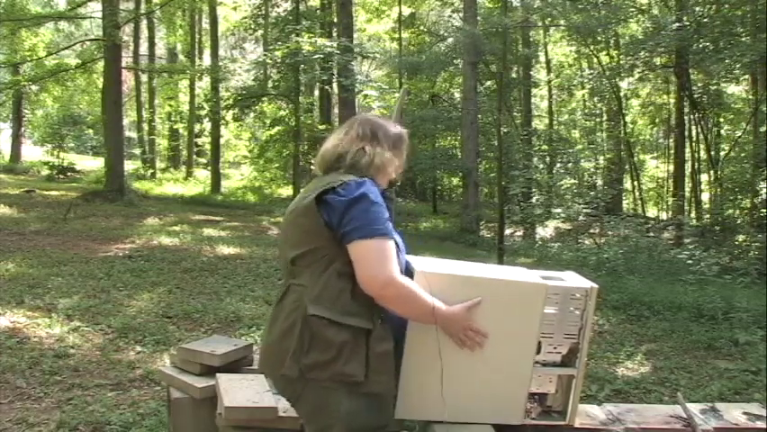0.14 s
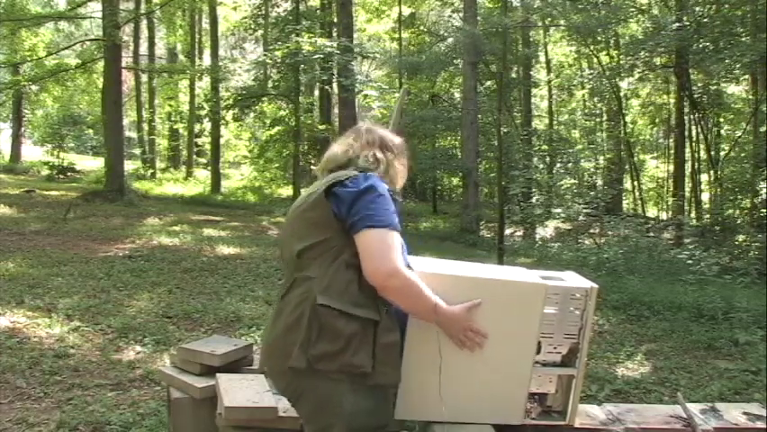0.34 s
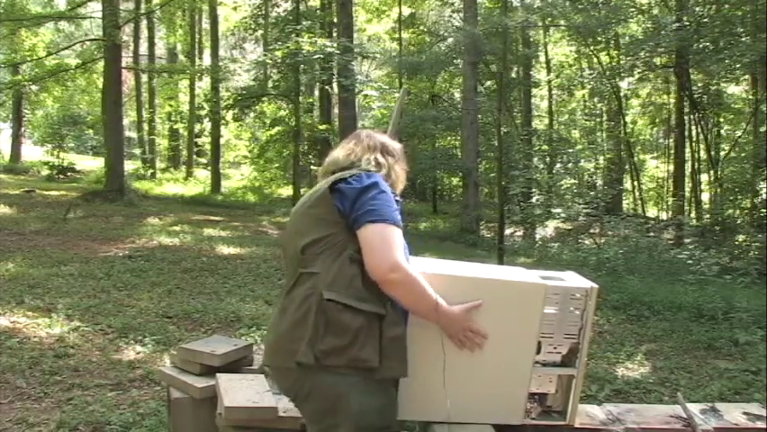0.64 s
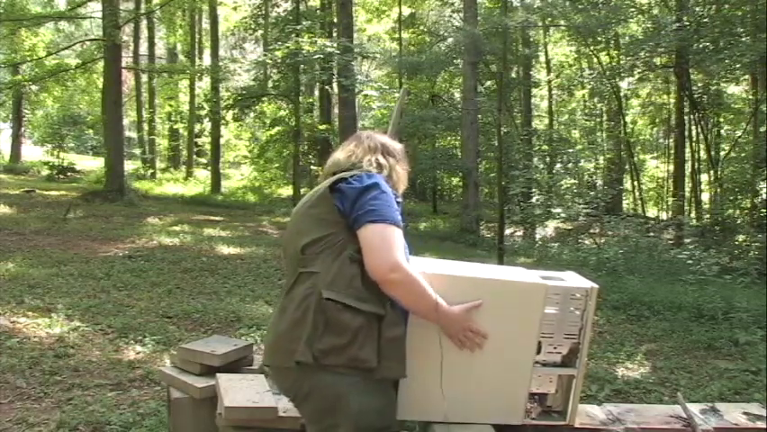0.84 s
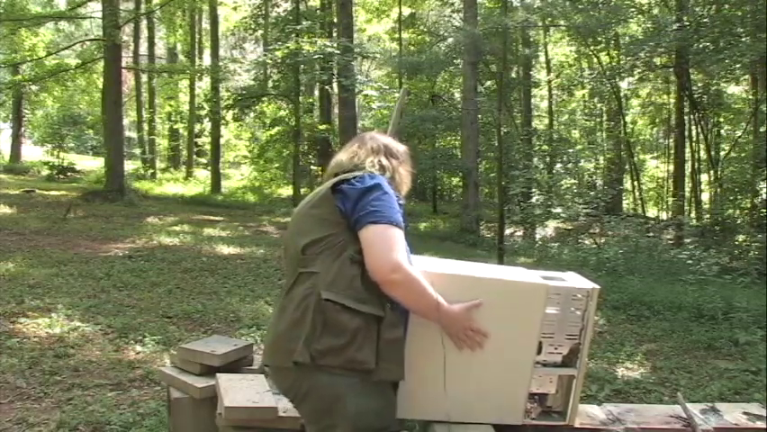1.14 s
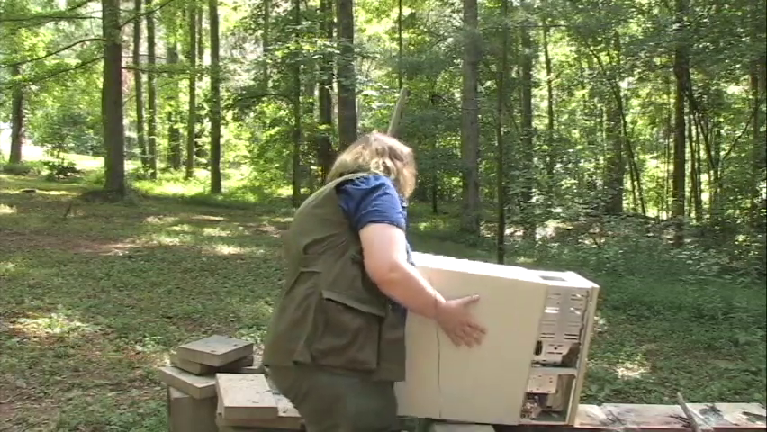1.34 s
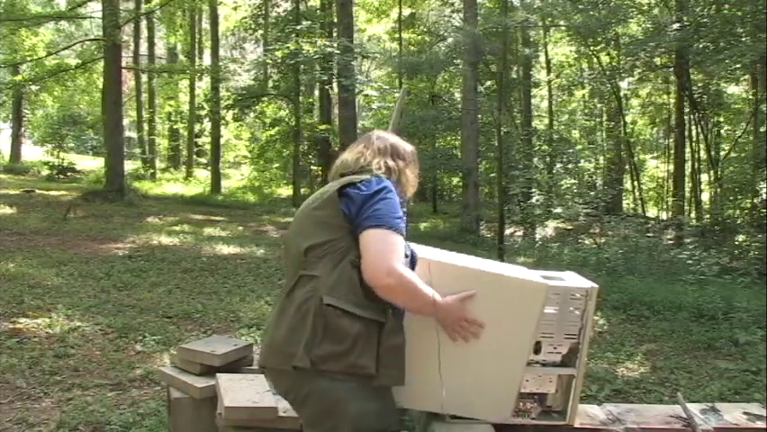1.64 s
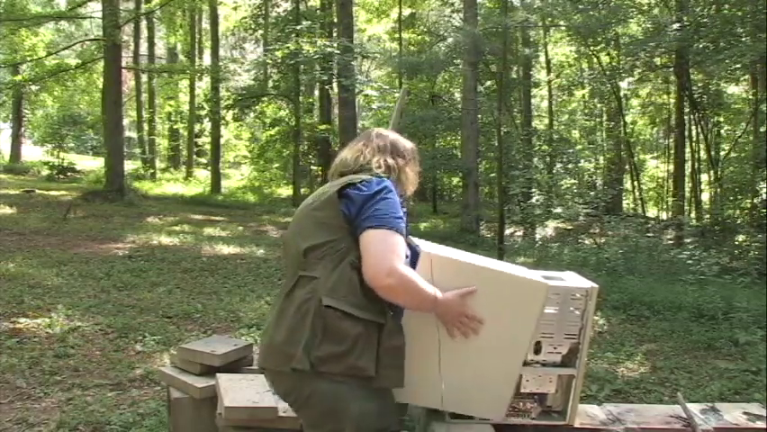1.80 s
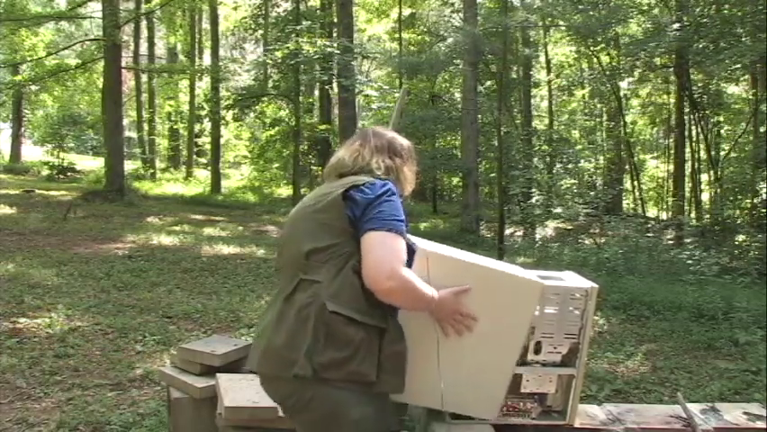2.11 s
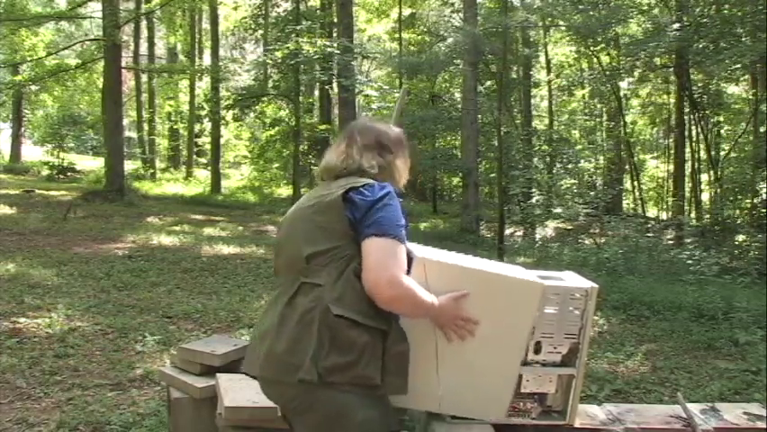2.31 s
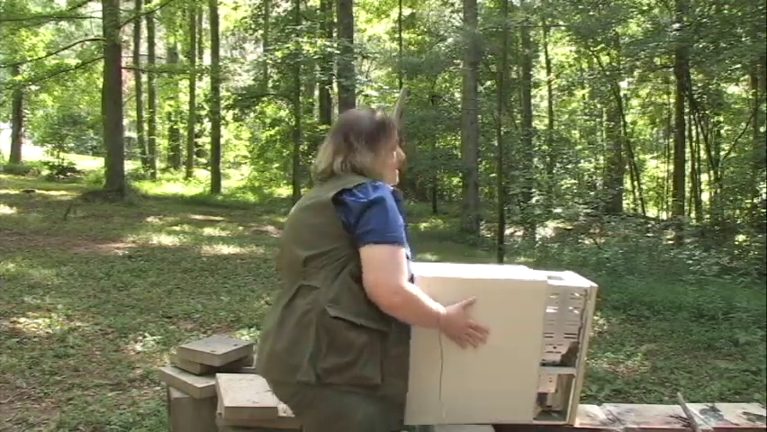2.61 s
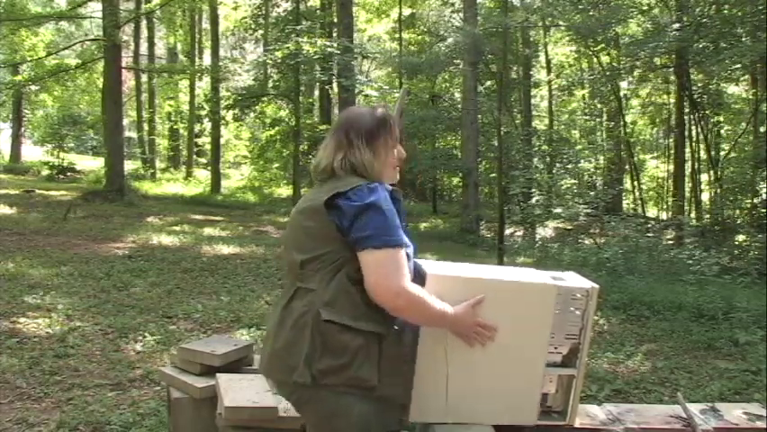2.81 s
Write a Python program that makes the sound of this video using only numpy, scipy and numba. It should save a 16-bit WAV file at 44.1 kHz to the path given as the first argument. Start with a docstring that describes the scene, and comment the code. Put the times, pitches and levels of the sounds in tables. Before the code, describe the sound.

A sheet-metal computer cover knocks and scrapes along its frame, with hollow clanks building outdoors

```python
"""Sheet-metal cover pushed along its frame

A computer cover is pushed and slid along its frame by hand, outdoors in a wood. Edges knock and catch,
metal scrapes on metal: short pushes and dense random catches both shake the same many panel modes and a
hollow boom whose pitch moves. Some panels ring on as fading sines, and a thin squeak is a gliding sine.
Filtered noise makes the distant rumble and air underneath.
"""
import sys
import numpy as np
from scipy import signal
from scipy.fft import rfft, irfft
from scipy.io import wavfile
from numba import njit

SR = 44100
rng = np.random.default_rng(int(sys.argv[2]) if len(sys.argv) > 2 else 0)


def unload_audio(sound):
    """Save the sound as a 16-bit wav file, at the path given as the first command line argument."""
    columns = np.transpose(np.atleast_2d(sound))
    # keep every value between -1 and 1, then stretch to whole-number steps
    steps = np.round(np.clip(columns, -1, 1) * 32767)
    wavfile.write(sys.argv[1], SR, steps.astype(np.int16))


N = 130095

# Scraping strength, one list per hand stroke. Each row: time in seconds, then treble, middle, bass
# and thud levels in dB, before the trims below.
SCRAPE_STROKES = [
    [(0.0, -70, -60, -36, -45), (0.036, -86, -44.5, -59, -41), (0.156, -88, -48, -46, -76),
     (0.298, -76, -66, -52, -48), (0.51, -87.5, -72, -66, -64), (1.264, -80, -72.5, -54.5, -47.5),
     (1.34, -74, -61, -46, -55)],
    [(1.36, -81, -65, -61, -37), (1.415, -73, -72, -45, -48), (1.425, -45, -40, -26.5, -50),
     (1.446, -47, -27, -25.5, -56), (1.484, -51, -35, -27, -47), (1.515, -53, -31.5, -26, -45),
     (1.545, -69, -59, -40.5, -43), (1.57, -86, -56, -41, -52), (1.64, -83, -51, -42, -62)],
    [(1.668, -75, -55, -47.5, -46), (1.748, -63, -52, -44, -42), (1.81, -68, -52, -51, -53),
     (1.85, -63, -51.5, -39, -42), (1.9, -68.5, -50.5, -53, -55), (1.984, -50, -39, -43, -39),
     (2.02, -64, -51, -61, -38), (2.064, -60.5, -48, -42, -44), (2.09, -55.5, -43, -46, -40),
     (2.125, -68, -69, -41.5, -45), (2.145, -59, -57, -55, -46), (2.165, -71, -82, -49, -56),
     (2.222, -71, -80, -52, -51)],
    [(2.235, -58, -46, -44.5, -52), (2.394, -61, -45.5, -40.5, -37), (2.456, -67, -38.5, -25, -40),
     (2.534, -51, -36, -43.5, -32), (2.59, -34.5, -35.5, -56, -55)],
    [(2.61, -47, -31.5, -20, -44), (2.664, -33.5, -27, -22, -49), (2.69, -37, -20, -20, -50),
     (2.72, -50, -41, -31, -54), (2.78, -44, -29, -25, -61), (2.83, -50, -37, -36.5, -62),
     (2.89, -50, -36.5, -34, -70), (2.95, -58, -37, -45, -66)],
]
# Added to every scrape level: treble, middle, bass and thud in dB.
SCRAPE_TRIM_DB = (0, -3.5, -7, -6.5)
CATCHES_PER_S, CATCH_SPREAD_DB, SLIP_SPREAD_DB = 1800, 2, 1.5

# Edges knocking. Each row: start in seconds, then treble, middle, bass and thud levels in dB,
# before the trims below.
KNOCKS = [(0.018, -44.5, -44.5, -70, -60), (0.0431, -26, -29, -34, -37), (0.0953, -34, -34.5, -38.5, -58),
          (0.1269, -51, -40.5, -44, -62), (0.1513, -45, -55, -38.5, -65), (0.1591, -43, -41.5, -48, -58),
          (0.188, -43, -53, -45, -72), (0.2117, -59, -67, -45, -69), (0.3164, -58, -54, -56, -55),
          (1.2154, -49, -47.5, -64, -81), (1.3512, -37.5, -34.5, -30, -28),
          (1.3682, -25.5, -30.5, -30, -44), (1.4204, -37, -31.5, -38.5, -37), (1.492, -26, -30, -37.5, -37),
          (1.536, -46, -53, -34, -50), (1.6006, -35.5, -40, -41.5, -55), (1.833, -52, -44, -43, -55),
          (2.0041, -58, -41.5, -37.5, -37), (2.0788, -44, -43, -41, -40), (2.135, -36, -37, -70, -46),
          (2.232, -38, -43.5, -53, -64), (2.3272, -58, -47, -41, -51), (2.3624, -45, -34.5, -43.5, -32.5),
          (2.4059, -26, -22, -32, -39), (2.424, -31.5, -26.5, -37, -24.5), (2.463, -31.5, -25, -34.5, -39),
          (2.53, -32, -41, -38, -49), (2.6, -14, -19.5, -22.5, -52), (2.6342, -20.5, -25, -20, -38),
          (2.6545, -23.5, -27.5, -23, -44), (2.7284, -19.5, -22, -21, -52), (2.7508, -33, -25, -30, -45),
          (2.7648, -23, -27.5, -38, -53), (2.787, -31, -30.5, -29, -60), (2.8073, -32.5, -33, -42, -53),
          (2.8393, -31, -36.5, -38, -67), (2.8557, -22.5, -20, -32.5, -67),
          (2.9205, -38, -35.5, -37, -66.5), (2.9379, -30.5, -36.5, -45, -58)]
# Added to every knock level: treble, middle, bass and thud in dB.
KNOCK_TRIM_DB = (-14, -4, -3.5, -5)
# How quickly the rough wake of a knock fades (to 37 percent): treble, middle, bass and thud in seconds.
CONTACT_S = (.0003, .0006, .001, .003)
# Roughness of that wake, where the sharp first push is 3: treble, middle, bass and thud.
ROUGHNESS = (0.37, 1, 0.4, 0.3)

# The many weaker modes of the sheet, before small random changes and the grip of each stroke.
# Each row: frequency in Hz, relative level in dB, time to fade by 60 dB in seconds.
SHEET_MODES = [(24.8, -16.5, .15), (60.6, -18.5, 0.032), (175, 1, 0.19), (464, -5, 0.16),
               (1150, -5.5, 0.23), (1650, -3, 0.21), (2220, -5.5, 0.18), (3180, -3, 0.16),
               (4200, -10, 0.14), (6500, -12.5, 0.1), (10100, -12.5, 0.043), (12400, -20, 0.05),
               (16400, -35, 0.048)]
MODE_SPREAD_DB = 0   # random spread of the weaker modes' levels; 0 leaves them smooth
# The strongest panel modes, before the grip of each stroke.
# Each row: frequency in Hz, relative level in dB, time to fade by 60 dB in seconds.
PANEL_MODES = [(406.7, 3.5, 0.39), (450.5, 10, 0.23), (563, 8, 0.23), (710, -3.5, 0.077), (1049, 4, 0.54),
               (1227, 14.5, 0.14), (1443, -5.5, 0.6), (1470, 6.5, 0.23), (1590, 11.5, 0.13),
               (1823, 3, 0.35), (2155, 3.5, 0.34), (2944, 7, 0.19), (3115, -4.5, 0.091), (3497, 3, 0.2)]
# Borders between treble, middle, bass and thud, in Hz from high to low.
BAND_BORDERS_HZ = (4500, 800, 140)
BLEND_OCTAVES = .8   # width of the crossfade at each border

# The cover is held differently in each stroke: one factor per stroke that multiplies the mode pitches.
STROKE_FLEX = (1.05, 1.11, .96, .99, 1)
# Tilt of the middle modes: one value per stroke, in dB per octave.
STROKE_TILT_DB = (-0.7, -1.2, -2, -2, 1)

# Hollow boom as the cover shifts. Each row: time in seconds, pitch in Hz.
BOOM_PITCH = [(0, 233.7), (1.3, 243.3), (1.6, 237.6), (2.3, 227.6), (2.39, 198.6), (2.56, 181.4),
              (2.6, 279), (2.95, 277)]
BOOM_T60_S, BOOM_DB = 0.17, -1.5   # time to fade by 60 dB, level

# A resonance that glides while the edge scrapes. Each row: time in seconds, pitch in Hz, level in dB.
SCRAPE_TONE = [(1.66, 1460, -72), (1.73, 1500, -61), (1.82, 1770, -56.5), (1.93, 1750, -58),
               (2.02, 1550, -49.5), (2.1, 1550, -69)]
SCRAPE_TONE_T60_S = 0.019

# The rumble and air. Each row: frequency in Hz, relative noise level in dB per Hz.
AIR_SPECTRUM = [(12, -55), (20, -39), (48, 2.5), (150, -0.5), (177, -0.5), (367, -11.5), (446, -6.5),
                (558, -19), (607, -16.5), (976, -21.5), (16000, -45)]
AIR_DB, AIR_FLICKER_DB = -55.5, 1.5   # overall rms level, spread of each band's flicker

# A thin squeak. Each row: time in seconds, pitch in Hz, level in dB.
SQUEAK = [(.22, 12190, -83), (.255, 11700, -85), (.31, 13400, -86), (.345, 13000, -95)]

# Free panels left ringing. Each row: start in seconds, pitch in Hz, level in dB,
# time to fade by 60 dB in seconds.
RINGS = [(1.51, 489.4, -34, 0.83), (1.52, 549, -35.5, 0.28), (1.709, 430.5, -44, 0.39),
         (2.404, 279.7, -26, 0.37), (2.424, 181.4, -22, 0.44), (2.625, 275.5, -16, 0.59),
         (2.756, 273, -27, 0.39)]


def from_db(db):
    """Turn decibels into a gain."""
    return 10 ** (np.asarray(db) / 20)


def rms_one(x):
    """Scale a signal to an rms (average strength) of 1."""
    return x / np.sqrt(np.mean(x ** 2) + 1e-20)


def in_time(rows):
    """Draw straight lines between table rows, giving each column a value at every sample."""
    seconds, *columns = np.transpose(rows)
    return [np.interp(np.arange(N) / SR, seconds, column) for column in columns]


def drift(rate_hz):
    """A slow random wander of spread 1: noise smoothed by a two-step low-pass filter."""
    r = np.exp(-2 * np.pi * rate_hz / SR)
    noise = rng.standard_normal(N + SR)
    smooth = signal.lfilter([1], [1, -2 * r, r * r], noise)
    return rms_one(smooth[SR:])   # skip the filter's first second


def grit():
    """Scraping force: dense uneven catches of metal on metal, swelling and easing in slips."""
    size_db = CATCH_SPREAD_DB * np.minimum(rng.exponential(1, N), 5)
    catches = from_db(size_db) * rng.choice([-1, 1], N)
    happens = rng.random(N) < CATCHES_PER_S / SR
    slips = from_db(SLIP_SPREAD_DB * drift(14.3))
    return rms_one(catches * happens * slips)


def air():
    """Rumble and air: half-octave bands of noise, each flickering a little in level."""
    edges = 17 * 2 ** np.arange(0, 10.1, .5)
    white = rng.standard_normal((2, N))   # neighbouring bands use different noise
    hz, db = np.transpose(AIR_SPECTRUM)
    total = np.zeros(N)
    for k, (low, high) in enumerate(zip(edges, edges[1:])):
        band_filter = signal.butter(2, [low, high], "band", fs=SR, output="sos")
        band = signal.sosfilt(band_filter, white[k % 2])
        level_db = np.interp(np.log(low * high) / 2, np.log(hz), db)
        total += band * from_db(level_db + AIR_FLICKER_DB * drift(8.4))
    return from_db(AIR_DB) * rms_one(total)


def knocks(band):
    """Knocking force in one band: each knock is a sharp push with a short rough wake."""
    force = np.zeros(N + SR)
    t = np.arange(SR // 20) / SR
    for start, *levels_db in KNOCKS:
        burst = ROUGHNESS[band] * rng.standard_normal(len(t)) * np.exp(-t / CONTACT_S[band])
        burst[0] = 3   # the sharp push
        burst *= np.sqrt(.02 * SR / np.sum(burst ** 2))   # same energy for every burst
        i = int(start * SR)
        force[i:i + len(t)] += from_db(levels_db[band] + KNOCK_TRIM_DB[band]) * burst
    return force[:N]


def sheet_responses():
    """How the sheet answers a tap in each band: many fading sines, summed and scaled to energy 1."""
    hz = 16500 * np.linspace(.005, 1, num=1600) ** 1.3 * rng.uniform(.99, 1.01, 1600)
    table_hz, *columns = np.transpose(SHEET_MODES)
    db, t60 = (np.interp(np.log(hz), np.log(table_hz), column) for column in columns)
    db = db + MODE_SPREAD_DB * rng.standard_normal(len(hz))
    t60 = t60 * rng.uniform(0.79, 1.41, len(hz))
    modes = np.vstack([np.transpose([hz, db, t60]), PANEL_MODES])
    t = np.arange(SR // 2) / SR
    out = np.zeros((4, SR // 2))
    for f, level_db, decay in modes:
        n = int(min(decay, .5) * SR)
        phase = rng.uniform(0, 2 * np.pi) * (f > BAND_BORDERS_HZ[2])   # lowest modes all start at zero
        mode = from_db(level_db - 60 * t[:n] / decay) * np.sin(2 * np.pi * f * t[:n] + phase)
        # divide the mode's power between the bands, blending at their borders
        below = np.clip(.5 + np.log2(np.array(BAND_BORDERS_HZ) / f) / BLEND_OCTAVES, 0, 1)
        share = np.sqrt(-np.diff(np.r_[1, below, 0]))
        out[:, :n] += share[:, None] * mode
    return out / np.sqrt(np.sum(out ** 2, axis=1, keepdims=True))


def held(force, response, tilts_db):
    """Each stroke's force rings the sheet, whose pitch, fading and tilt follow that stroke's grip."""
    out = np.zeros(N)
    # a new grip begins 12 ms before the first scrape row of its stroke
    starts = [0] + [int((stroke[0][0] - .012) * SR) for stroke in SCRAPE_STROKES[1:]] + [N]
    for a, b, flex, tilt_db in zip(starts, starts[1:], STROKE_FLEX, tilts_db):
        # a shorter copy rings higher and fades sooner
        bent = signal.resample(response, int(len(response) / flex)) * np.sqrt(flex)
        octaves = np.log2(np.linspace(1, SR / 2, len(bent) // 2 + 1) / 1900)   # tilt turns at 1900 Hz
        bent = irfft(rfft(bent) * from_db(tilt_db * octaves), len(bent))
        ringing = signal.fftconvolve(force[a:b], bent)
        out[a:] += np.pad(ringing, (0, N))[:N - a]
    return out


@njit
def gliding_ring(x, hz, r, sr):
    """A resonance with moving pitch: each sample feeds on the two before it."""
    y = np.zeros(len(x))
    for i in range(2, len(x)):
        w = 2 * np.pi * hz[i] / sr
        y[i] = np.sin(w) * x[i - 1] + 2 * r * np.cos(w) * y[i - 1] - r * r * y[i - 2]
    return y


def resonance(force, hz, t60):
    """A moving resonance, scaled to keep the power of a noisy force."""
    r = from_db(-60 / (t60 * SR))   # fading per sample
    return np.sqrt(2 * (1 - r * r)) * gliding_ring(force, hz, r, SR)


def cover():
    """Knocks and scraping shake the sheet; scraping sounds a gliding tone, the bass force a boom."""
    rub = grit()
    scrape_db = in_time(np.vstack(SCRAPE_STROKES))
    forces = [knocks(band) + from_db(scrape_db[band] + SCRAPE_TRIM_DB[band]) * rub for band in range(4)]
    sheet = np.zeros(N)
    for band, response in enumerate(sheet_responses()):
        tilts_db = np.array(STROKE_TILT_DB) * (band == 1)   # only the middle is tilted
        sheet += held(forces[band], response, tilts_db)
    boom = from_db(BOOM_DB) * resonance(forces[2], in_time(BOOM_PITCH)[0], BOOM_T60_S)
    tone_hz, tone_db = in_time(SCRAPE_TONE)
    tone = resonance(from_db(tone_db) * rub, tone_hz, SCRAPE_TONE_T60_S)
    return sheet + boom + tone


def squeak():
    """A faint whistle: one sine wave with gliding pitch and level."""
    hz, db = in_time(SQUEAK)
    t = np.arange(N) / SR
    sounding = (t > SQUEAK[0][0]) * (t < SQUEAK[-1][0])
    return from_db(db) * sounding * np.sin(2 * np.pi * np.cumsum(hz) / SR)


def rings():
    """Free panels that outlast the blows: single sines that start softly and fade away."""
    out = np.zeros(N)
    for start, hz, db, t60 in RINGS:
        t = np.maximum(np.arange(N) / SR - start, 0)
        onset = 1 - np.exp(-t / 0.0023)
        out += from_db(db - 60 * t / t60) * onset * np.sin(2 * np.pi * hz * t)
    return out


def scene():
    """Add the cover, its squeak and its rings to the outdoor air, as one channel."""
    return (cover() + air() + squeak() + rings())[None]


def record(dry):
    """Cut the top with a steep low-pass filter at 16300 Hz."""
    low_pass = signal.ellip(12, .5, 60, 16300, fs=SR, output="sos")
    return signal.sosfilt(low_pass, dry)


dry = scene()
out = record(dry)
unload_audio(out)
```